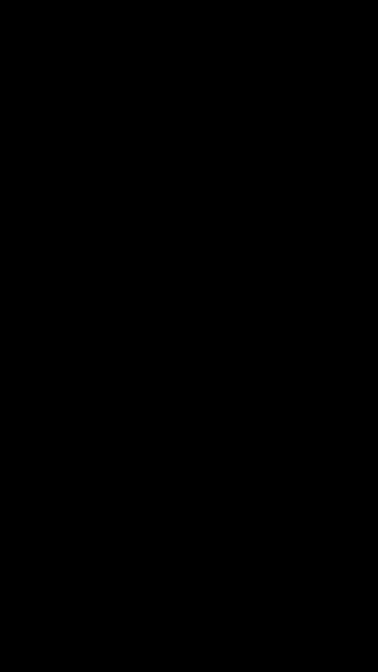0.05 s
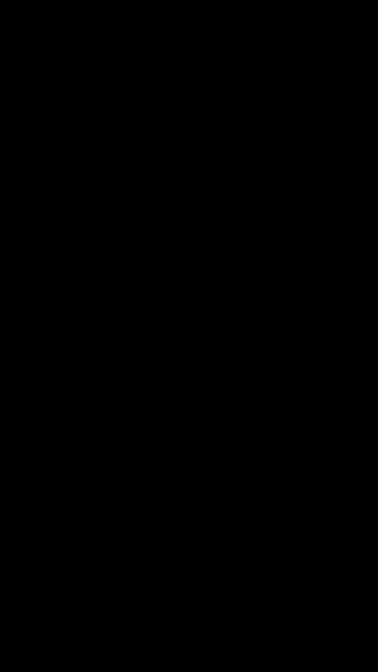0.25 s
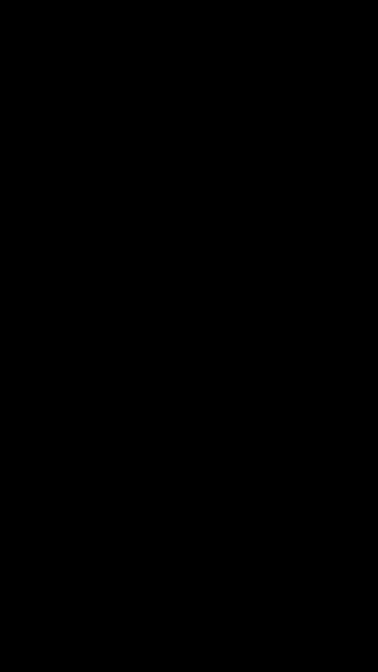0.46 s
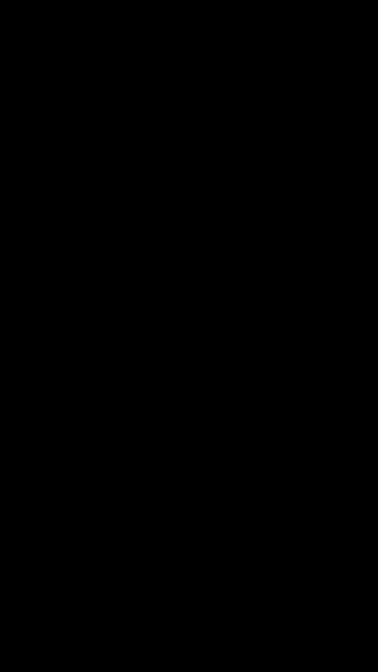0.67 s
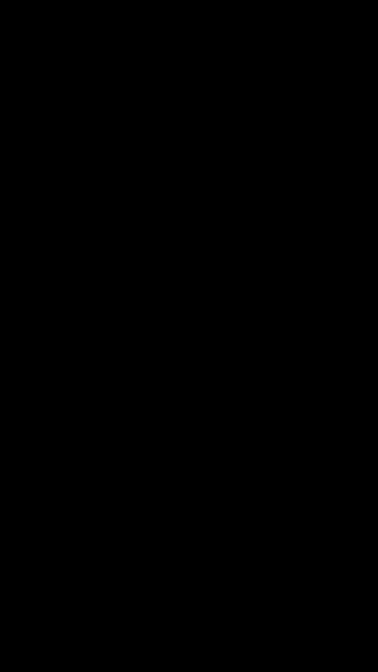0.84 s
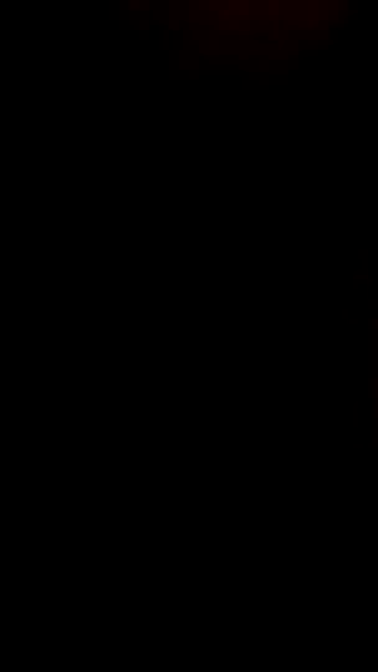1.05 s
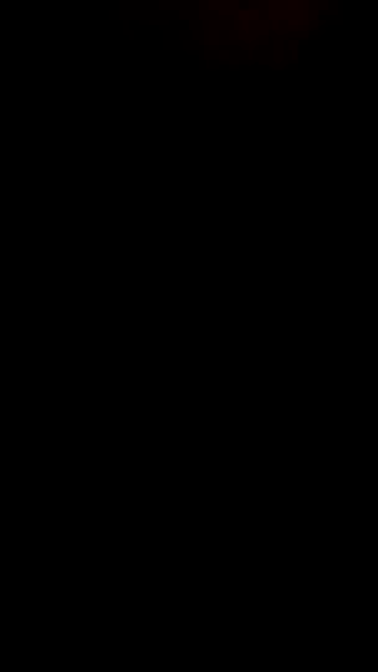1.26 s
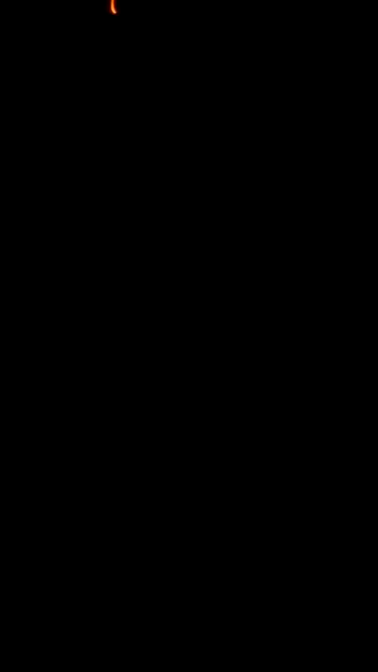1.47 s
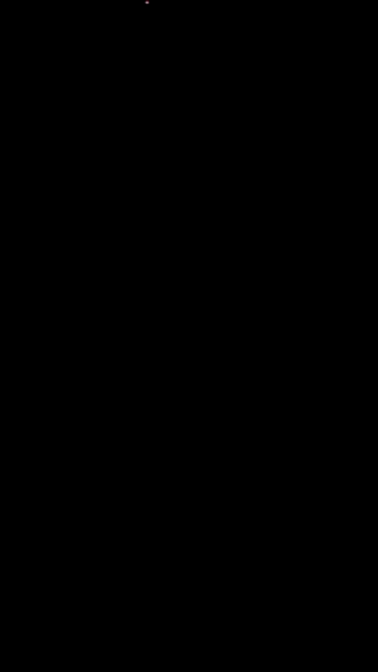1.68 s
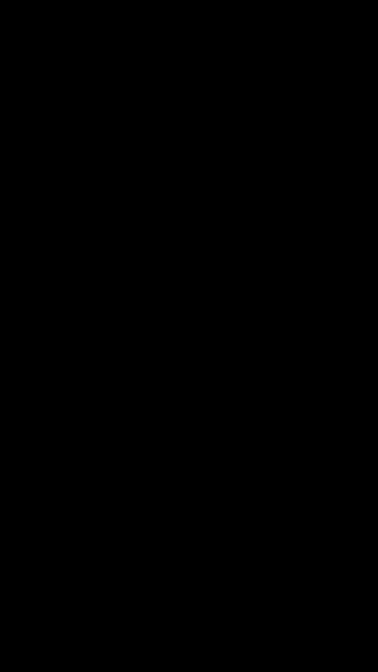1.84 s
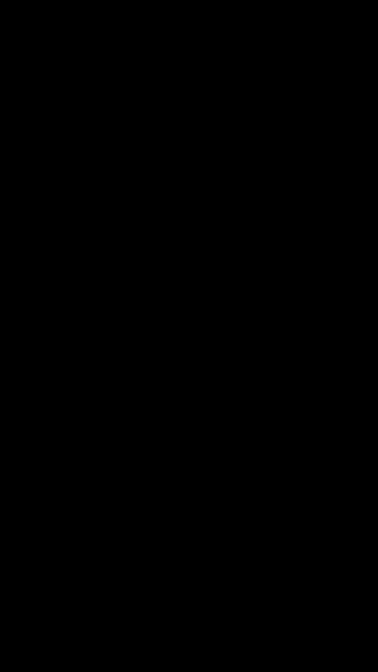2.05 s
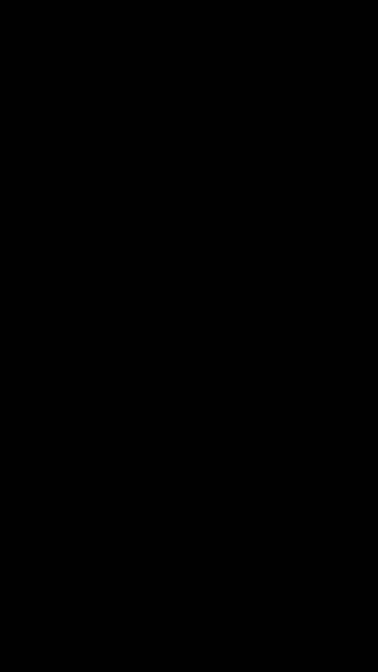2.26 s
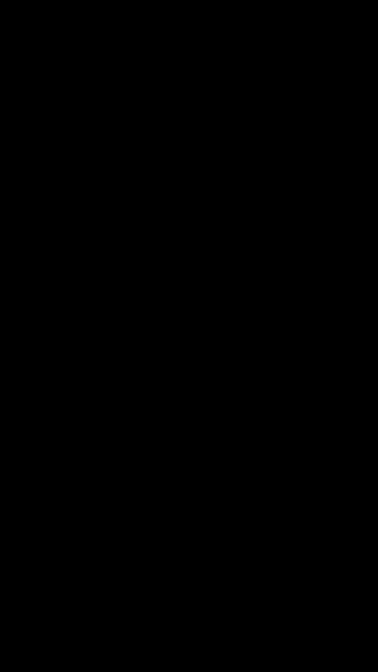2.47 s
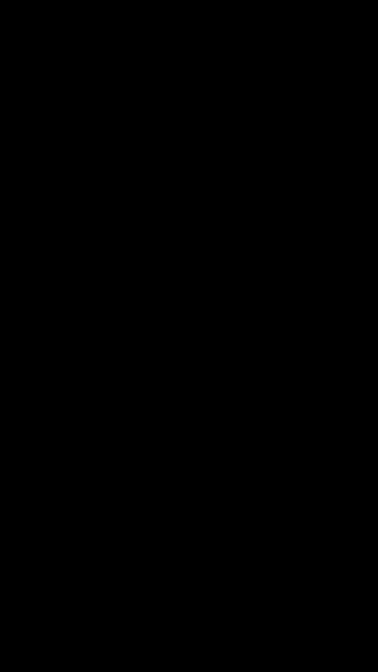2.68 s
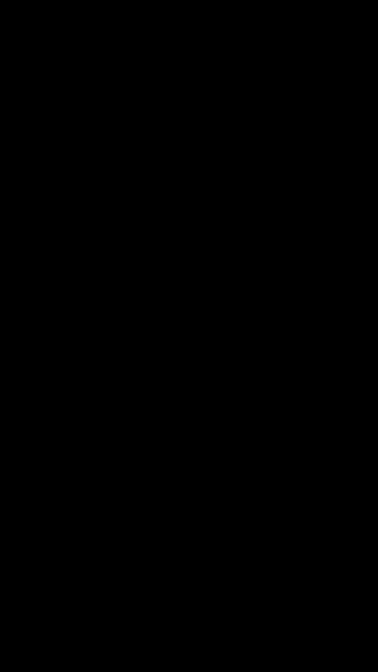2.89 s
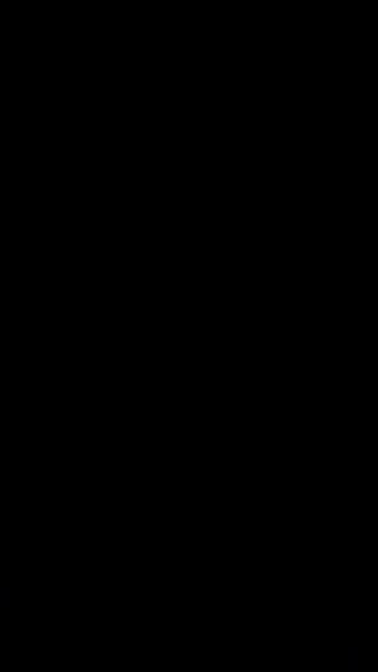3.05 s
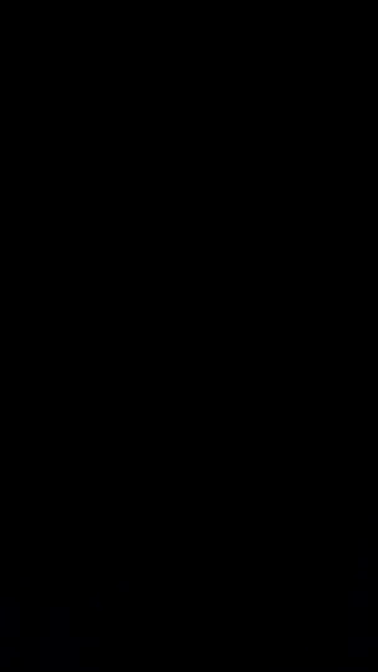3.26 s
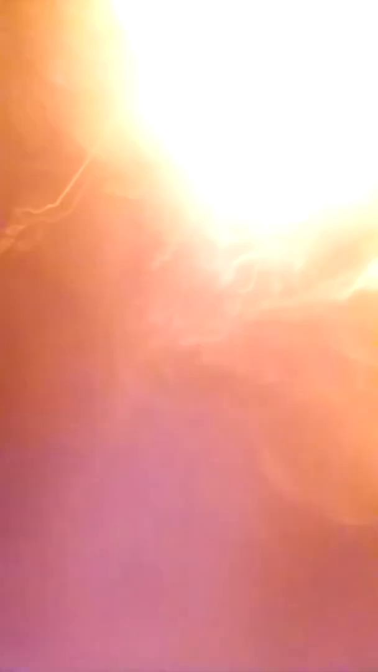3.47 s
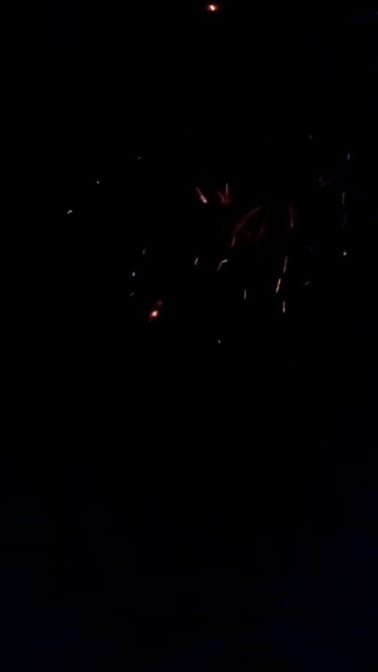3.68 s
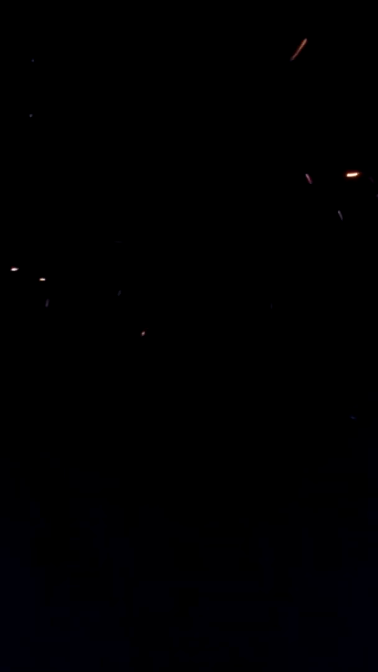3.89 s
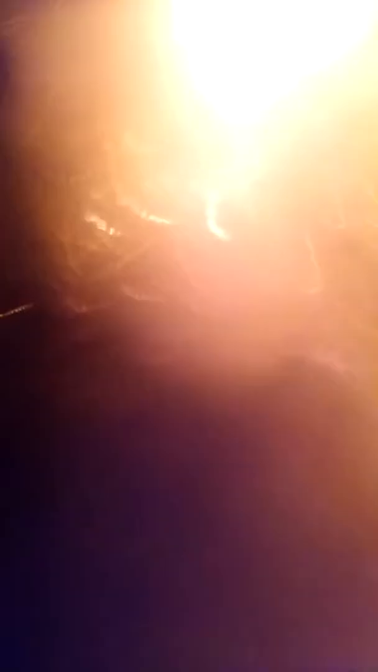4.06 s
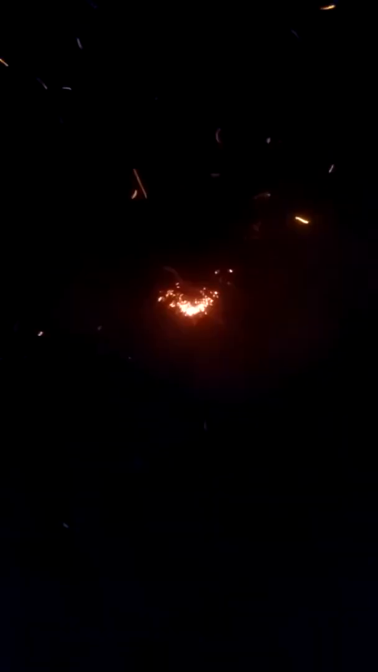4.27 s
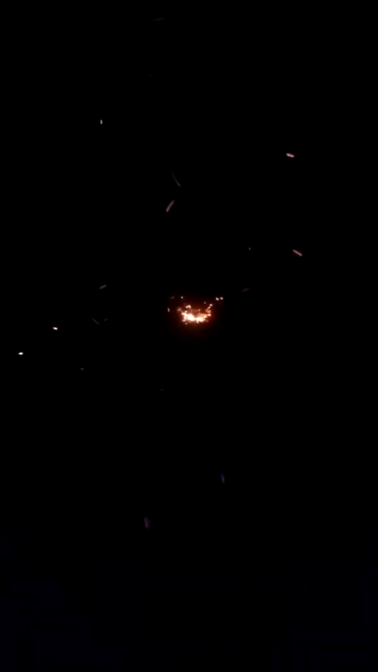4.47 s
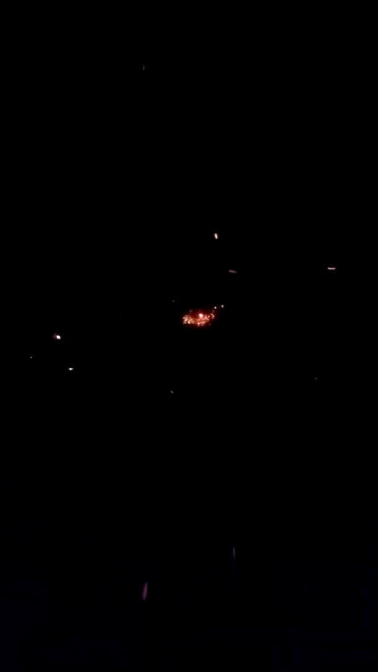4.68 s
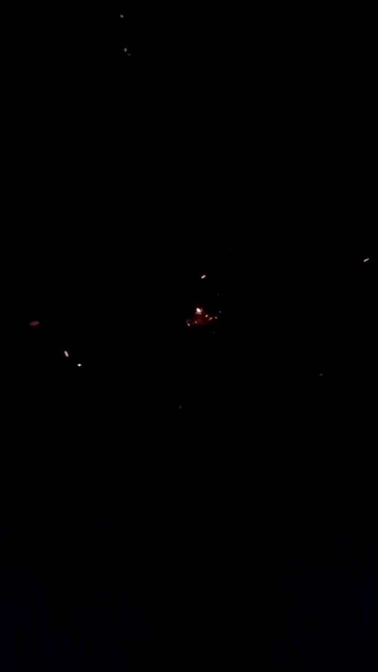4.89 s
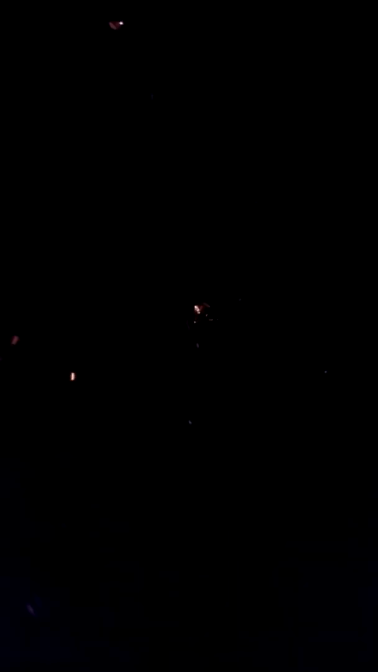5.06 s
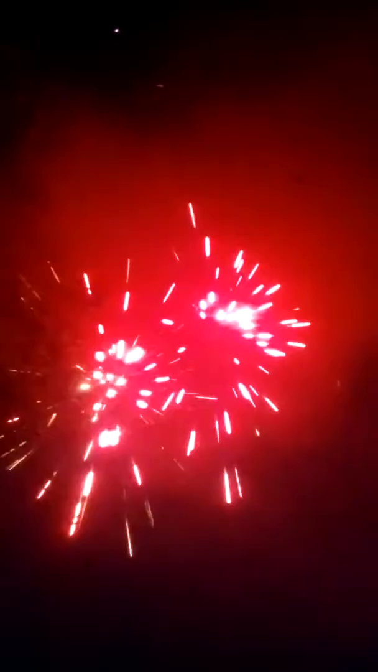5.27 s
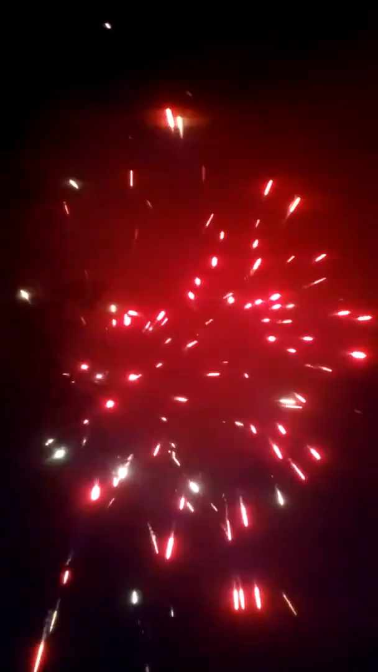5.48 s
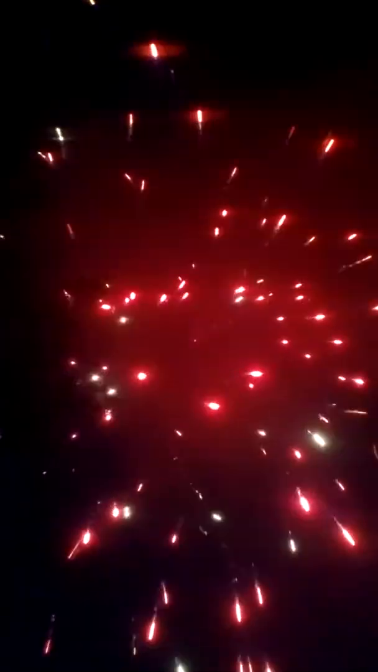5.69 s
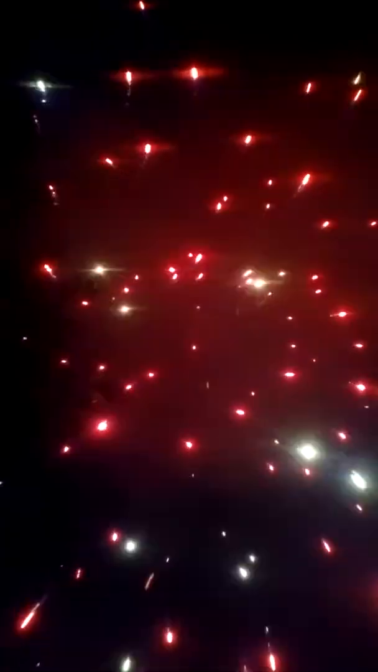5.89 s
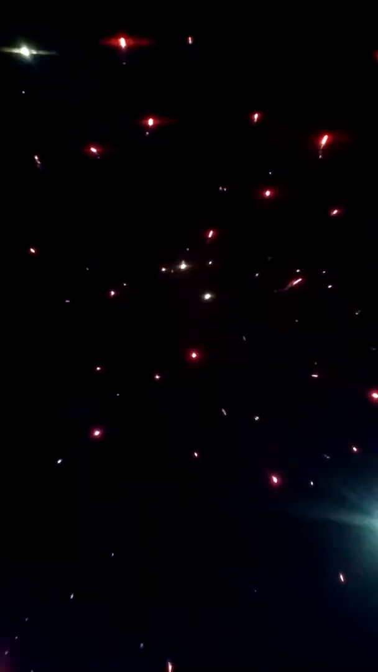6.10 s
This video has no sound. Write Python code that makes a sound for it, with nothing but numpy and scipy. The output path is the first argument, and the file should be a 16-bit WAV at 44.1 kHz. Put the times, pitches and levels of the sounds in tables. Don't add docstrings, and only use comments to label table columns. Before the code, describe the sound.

Outdoors at night, a burning fuse hisses thinly while a few far fireworks thud and pop. Then a very close bang cracks so hard that the phone microphone chokes, goes nearly silent and stutters back. A second choking bang follows half a second later, with its echo fading. After a pause comes the loudest blast, its noisy roll lingering to the end.

```python
import sys
import numpy as np
from scipy import signal
from scipy.fft import irfft, next_fast_len
from scipy.io import wavfile
from scipy.ndimage import uniform_filter1d, map_coordinates

SR = 44100
rng = np.random.default_rng(int(sys.argv[2]) if len(sys.argv) > 2 else 0)


def int16_out(signal):
    q = np.round(np.clip(np.atleast_2d(signal).T, -1, 1) * 32767)
    wavfile.write(sys.argv[1], SR, q.astype(np.int16))


def level_to_linear(level):
    exponent = np.asarray(level, float) / 20
    return 10 ** exponent


N = 270628

# frequency in Hz, level in dB per Hz.
FRESH_FUSE_COLOUR = [(35, -24), (100, -7.5), (450, -1), (900, -9), (1360, -1), (1900, -10), (3000, -7),
                     (5400, -3.5), (6800, -8), (7600, -17), (9300, -19), (16000, -33)]
DYING_FUSE_COLOUR = [(40, -25), (170, -19.5), (330, -12), (469, 1.5), (800, -22.5), (1110, -6.5),
                     (1510, -38.5), (1800, -15.5), (2700, -19.5), (4000, -22.5), (5700, -24.5),
                     (6800, -39.5), (7500, -47), (16000, -71)]
ECHO_COLOUR = [(24, -60.5), (40, -31), (171, -7.5), (412, -2.5), (455, -2), (542, -4.5), (615, -3),
               (1180, -11.5), (1760, -8), (2100, -12), (5310, -6.5), (8340, -27.5), (16000, -44.5)]
NIGHT_COLOUR = [(40, -21), (110, 4.5), (300, -15.5), (600, -35), (790, -4), (1100, -14), (1700, -9.5),
                (2150, -11), (2650, -16), (2970, -11), (3130, -13), (3290, -15.5), (3800, -14),
                (16000, -60)]
# lower edge in Hz, upper edge in Hz.
FIZZ_BANDS = [(50, 280), (280, 2400), (2400, 7000), (7000, 15500)]
ROLL_BANDS = [(50, 280), (280, 1200), (1200, 7000), (7000, 15500)]

# start in seconds,
# peak in dB, ring in Hz, cycles to fade, rise in cycles.
POPS = [(0.165, -13.5, 148, 0.86, 0.17), (1.685, -13, 183, 1.1, 0.15), (1.701, -25, 280, 2.3, 0.15),
        (1.715, -16, 310, 1.4, 0.12), (1.738, -10, 537, 2.6, 0.11), (1.771, -22, 503, 1.5, 0.15),
        (2.667, -12, 236, 1.1, 0.27), (2.695, -28, 455, 1.9, 0.15), (2.738, -27, 325, 1.3, 0.15),
        (3.314, -11.5, 323, 2, 0.15), (3.339, -5, 550, 1.5, 0.54), (3.416, -39, 455, 1.7, 0.17),
        (5.341, -38, 700, 1.2, 0.15), (5.941, -10, 446, 1.5, 0.14)]
FRONTS = [
    (3.5879, -11, 800, 2.1, 0.37),
    (3.5918, -1.5, 1059, 6.4, 0.082),
    (3.591, 0, 1894, 7.5, 0.088),
    (4.1364, 2.5, 452, 1.6, 0.055),
    (4.2704, -0.5, 378, 3.4, 0.17),
    (5.3747, -13, 456, 1.9, 0.056),
    (5.375, 3.5, 287, 3.7, 0.18),
    (5.394, 2, 508, 2.5, 0.2),
]
BOOMS = [(0.125, -30, 120, 1.2, .3), (0.31, -33, 70, 1.5, .3), (0.55, -33, 70, 2.2, .3),
         (2.745, -27, 110, 1.6, .3), (3.805, -11, 150, 3.5, .4), (3.86, -19, 100, 2.2, .4),
         (4.395, -17, 110, 2.2, .4), (4.69, -32, 150, 4.5, .5)]
SNAPS = [
    (1.7148, -17, 960, 0.54, 0.17),
    (3.3149, -15.5, 660, 1.2, 0.16),
    (5.3408, -34, 880, 1.7, .1),
    (5.224, -39, 1200, 1.1, .05),
]
# start in seconds, peak in dB, frequency in
# Hz, length in ms.
CRACKS = [(4.9686, -42, 7340, 0.068), (5.0918, -43, 6708, 0.07), (5.1163, -48, 7000, 0.07),
          (5.2225, -46, 6820, 0.077), (5.354, -40, 6848, 0.08),
          (5.8554, -47, 9050, 0.05), (5.9589, -45, 9490, 0.05), (6.0222, -29, 9350, 0.05),
              (6.0611, -28, 9290, 0.05), (6.1254, -35, 9434, 0.05),
          (1.1344, -32, 3070, 0.1), (1.2134, -22, 1500, 0.2), (1.5414, -32, 3900, 0.1),
         (1.6394, -38, 4150, 0.1), (5.2235, -37, 3400, 0.08)]
# centre in Hz, width in Hz, level in dB, start and
# end in seconds.
WHIRS = [(1900, 260, -44, -.4, 2.6), (5500, 400, -62, -.3, .4), (800, 120, -52, 4.3, 5.4),
         (520, 300, -22, 5.42, 6.5), (65, 50, -50, .6, 2.7), (70, 70, -42, 4.3, 5.15),
         (480, 200, -37, 3.8, 4.15), (1500, 700, -55, 4.4, 5.1), (320, 200, -24, 5.5, 6.5),
         (900, 160, -33, 4.37, 4.62), (490, 60, -45, .8, 3.9), (2180, 130, -57, 4.5, 5.7),
         (2420, 80, -61, 4.6, 5.8), (2970, 120, -59, 4.3, 5.6), (3290, 90, -62, 4.35, 5.6),
         (6900, 500, -80, 4.8, 5.5), (1700, 200, -66, 4.6, 5.5)]

# time in seconds, level in dB.
BURN = [(0.185, -65), (0.205, -39.5), (0.42, -40.5), (0.46, -32.5), (0.5, -40), (0.61, -34), (0.64, -47.5),
        (0.7, -38.5), (0.91, -38.5), (1.25, -47), (1.74, -45.5), (1.79, -47.5), (2.35, -46.5),
        (2.385, -45.5), (2.84, -49.5), (2.9, -43.5), (3.28, -44.5), (3.5, -51)]
# time in seconds, level in dB.
GLOW = [(0, -50), (1.05, -39), (1.55, -46), (1.85, -39), (2.1, -43), (2.55, -37), (2.72, -48), (3.12, -41),
        (3.5, -32)]
# start in seconds, bass in dB, middle in dB, fade in dB per second.
THUDS = [(0.03, -57, -40.5, 250), (0.171, -22, -46, 250), (0.455, -39, -50, 62), (1.68, -35, -40, 70),
         (2.668, -27, -53, 138), (3.31, -44, -25.5, 150), (3.375, -55, -34, 95)]
# time in seconds, extra delay in ms.
HAND = [(0, 0.91), (1.0, 0.83), (1.3, 0.74), (1.55, 0.71), (1.9, 0.55), (2.02, 0.71), (2.35, 0.62),
        (2.4, 0.93), (3.6, 0.97)]

# shock in seconds, full force until seconds, roll start in seconds, crest length in seconds,
# relative pace of fade.
BANGS = [
    (3.591, 3.714, 3.794, .07, 0.94),
    (4.136, 4.267, 4.387, .07, 1.2),
    (5.3735, 5.397, 5.4, 0.17, .66),
]
# high band in dB, then bass, middle and top against it in dB.
ROLLS = [
    (-17.5, -5, -12, -13.5),
    (-15, -11, -13, -17.5),
    (-8.5, -10.5, -2.5, -11),
]
ROLL_AIR_LOSS = [3.5, 3.5, 1.4]

# start in seconds, end in seconds, gain in dB.
STUCK = [(3.6068, 3.6965, -95), (3.6965, 3.777, -13), (4.1525, 4.258, -90), (4.2985, 4.3105, -26),
         (4.3105, 4.364, -48), (4.364, 4.378, -5), (5.3776, 5.3907, -50), (5.4015, 5.4042, -40),
         (5.410, 5.4107, -30), (6.138, 6.2, -90)]
# start in seconds, length in ms, gain in dB.
SLIPS = [(3.6965, 3, -4), (3.6995, 1.5, -30), (3.7145, 33, -4), (3.753, 4, -1), (3.761, 5, -3),
         (4.2125, 11, -38), (4.258, 6, -15), (4.264, 34.5, -3), (4.302, 1.5, -17), (4.309, 1.5, -7),
         (4.322, 1, -12), (4.329, 1.5, -16), (4.336, 1.5, -11), (4.340, 2, -12), (4.345, 6, -9),
         (4.3465, 2.5, -3), (4.357, 5, -9), (5.3794, 1.8, -1), (5.3825, 3.5, -1), (5.3872, 1.9, -4)]
# start in seconds, size in full scale, rise in ms.
JUMPS = [(3.605, 0.05, .3), (3.6754, 1.26, 0.083), (3.719, -0.87, 0.44), (3.7341, -0.89, 0.69),
         (3.752, -1, 1), (4.154, -0.15, .5), (4.2127, 0.06, 1), (4.2226, 0.18, .9), (4.223, 0.44, 0.054)]
# cutoff in Hz, Q.
RUMBLE_CUT = [(186.6, .75), (66.3, 1.07), (38.4, 2.1)]

HISS_DB = -81
STEP_S = .002
LONG = next_fast_len(int(3.6 * SR))

BURN_BASS_DB, BURN_MIDDLE_DB, BURN_TOP_DB = -6.5, 2, -17.5
MIDDLE_FADE_DB_PER_S, TOP_FADE_DB_PER_S = 1.2, 4
GLOW_BASS_DB, UNLIT_TOP_DB, THUD_RISE_DB_PER_S = -57, -68, 2500
FRESH_UNTIL_S, FRESH_FADE_S, UNLIT_SHARE = .95, 1.05, .4
GROUND_S, GROUND_SHARE, GROUND_HZ = 0.00085, 0.47, 2900
HAND_SHARE, HAND_TREMBLE_MS = .36, .012

SHOCK_DB, SHOCK_SHARE = np.array([-14.5, -7.5, -8, -18]), 0.74
FRONT_DULL_DB, FRONT_S = np.array([-2, 2.5, -7, -11]), .007
FADE_DB_PER_S = np.array([48, 55, 58, 100])
CREST_SHARE = np.array([0.74, .45, 0.92, .02])
NIGHT_DB, NIGHT_SHARE, NIGHT_PER_DB = np.array([-58, -63.5, -67, -83]), .3, .013

RAIL, CEILING, STUTTER = 0.95, 0.93, 0.25
CROSSOVER_HZ, CROSSOVER_WIDTH_HZ, TOP_HZ = 4010, 230, 15850


def spectrum(points, hz):
    f, db = np.transpose(points)
    return level_to_linear(np.interp(np.log(hz + 1), np.log(f), db))


def walk(rate_hz):
    hold = int(SR / rate_hz)
    steps = np.repeat(rng.standard_normal(N // hold + 1), hold)[:N]
    return 1.17 * uniform_filter1d(uniform_filter1d(steps, hold), hold)


def summed(*db):
    return 10 * np.log10(sum(level_to_linear(d) ** 2 for d in db))


def biquad(x, hz, q, high):
    w = 2 * np.pi * hz / SR
    a, c = np.sin(w) / (2 * q), np.cos(w)
    top = [(1 + c) / 2, -1 - c, (1 + c) / 2] if high else [a, 0, -a]
    return signal.lfilter(top, [1 + a, -2 * c, 1 - a], x)


def banded(rows, bands, first, second, flicker_db, rate_hz, air, echo=1):
    s, *band_db, share = rows
    hz = np.fft.rfftfreq(LONG, 1 / SR)
    start, at = int(s[0] * SR), (s * SR).astype(int)
    t = (start + np.arange(LONG)) / SR
    share = np.clip(np.interp(t, s, share), 0, 1)
    first_gain, second_gain = np.sqrt(share), np.sqrt(1 - share)
    centres = np.log2([np.sqrt(lo * hi) for lo, hi in bands])
    octaves = np.log2(hz + 1)
    colours = [spectrum(first, hz) * echo, spectrum(second, hz) * echo]
    noises = [c * np.exp(2j * np.pi * rng.random(len(hz))) for c in colours]

    def power_db(colour, lo, hi):
        inside = (hz > lo) & (hz < hi)
        return 10 * np.log10(2 * np.sum(np.abs(colour[inside]) ** 2) / LONG ** 2)

    own_db = [[power_db(c, lo, hi) for lo, hi in bands] for c in colours]
    loss_db = band_db[3] - band_db[2] - own_db[0][3] + own_db[0][2]
    out, gust = np.zeros(N + LONG), walk(rate_hz)
    for octave in np.arange(5, 14.6, .5):
        mask = np.cos(np.pi * np.clip(octaves - octave, -.5, .5)) ** 2
        weights = [np.interp(octave, centres, one) for one in np.eye(len(bands))]
        db = sum(weight * level for weight, level in zip(weights, band_db))
        db = db + air * max(octave - centres[3], 0) * loss_db
        db = db + flicker_db * (.7 * gust + .7 * walk(rate_hz))[at]
        a, b = (irfft(noise * mask, LONG) / level_to_linear(np.interp(octave, centres, own))
                for noise, own in zip(noises, own_db))
        out[start:start + LONG] += np.interp(t, s, level_to_linear(db)) * (first_gain * a + second_gain * b)
    return out[:N]


def before_bangs():
    return np.arange(N) < BANGS[0][0] * SR


def faint_hiss():
    return biquad(rng.standard_normal(N), 8000, .7, True) * level_to_linear(HISS_DB) * before_bangs()


def whirs():
    out, t = np.zeros(N), np.arange(N) / SR
    for hz, width_hz, db, start, end in WHIRS:
        q = hz / width_hz
        band = biquad(biquad(rng.standard_normal(N), hz, q, False), hz, q, False)
        swell = np.sin(np.pi * np.clip((t - start) / (end - start), 0, 1) ** .45)
        out += level_to_linear(db) * swell * band / np.std(band)
    return out


def ticks():
    out, t = np.zeros(N + 256), np.arange(256) / SR
    for s, db, hz, ms in CRACKS:
        age = t / ms * 1000
        start = int(s * SR)
        out[start:start + 256] += level_to_linear(db) * np.sin(2 * np.pi * hz * t) * np.e * age * np.exp(-age)
    return out[:N]


def fuse_levels():
    t = np.arange(0, BANGS[0][0], STEP_S)
    burn = np.interp(t, *np.transpose(BURN))
    glow = np.interp(t, *np.transpose(GLOW))
    fades = [np.where(t < s, THUD_RISE_DB_PER_S * (t - s), fade * (s - t)) for s, _, _, fade in THUDS]
    bass_thuds = [f + row[1] for f, row in zip(fades, THUDS)]
    middle_thuds = [f + row[2] for f, row in zip(fades, THUDS)]
    bass = summed(burn + BURN_BASS_DB, GLOW_BASS_DB, *bass_thuds)
    middle = summed(burn + BURN_MIDDLE_DB - MIDDLE_FADE_DB_PER_S * t, glow, *middle_thuds)
    top = summed(burn + BURN_TOP_DB, UNLIT_TOP_DB) - TOP_FADE_DB_PER_S * t
    ageing = np.exp(-(np.maximum(t - FRESH_UNTIL_S, 0) / FRESH_FADE_S) ** 2)
    fresh = np.where(t < BURN[1][0], UNLIT_SHARE, ageing)
    return t, bass, middle, burn, top, fresh


def fizz():
    hz = np.fft.rfftfreq(LONG, 1 / SR)
    mirror = GROUND_SHARE * np.exp(-(np.log((hz + 1) / GROUND_HZ) / 0.8) ** 4)
    ground = 1 - np.clip(mirror, 0, 1) * np.exp(-2j * np.pi * hz * GROUND_S)
    fuse = banded(fuse_levels(), FIZZ_BANDS, FRESH_FUSE_COLOUR, DYING_FUSE_COLOUR,
                  flicker_db=2.0, rate_hz=25, air=0.062, echo=ground)
    return fuse * before_bangs()


def hand(x):
    s, ms = np.transpose(HAND)
    n = np.arange(N)
    delay_ms = np.interp(n / SR, s, ms) + HAND_TREMBLE_MS * walk(5)
    late = map_coordinates(biquad(x, 3200, 0.55, False), [n - delay_ms * SR / 1000], order=3)
    return x - HAND_SHARE * late


def pulses():
    out, t = np.zeros(N + 4096), np.arange(4096) / SR
    for sign, table in [(-1, POPS), (-1, FRONTS), (-1, BOOMS), (1, SNAPS)]:
        for s, db, hz, cycles, rise in table:
            envelope = np.exp(-2 * t * hz / cycles) * (1 - np.exp(-t * hz / rise))
            wave = np.sin(2 * np.pi * hz * t) * envelope
            start = int(s * SR)
            out[start:start + 4096] += sign * level_to_linear(db) * wave / np.max(wave)
    return out[:N]


def roll():
    t = np.arange(BANGS[0][0] - STEP_S, N / SR, STEP_S / 2)
    db, share, air = np.full((4, len(t)), -150.), np.ones(len(t)), np.zeros(len(t))
    for bang, (high, bass, middle, top), loss in zip(BANGS, ROLLS, ROLL_AIR_LOSS):
        shock, held, start, crest, pace = bang
        roll_db = high + np.array([bass, middle, 0, top])
        front = FRONT_DULL_DB[:, None] * np.clip(1 - (t - shock) / FRONT_S, 0, 1)
        sag = np.clip((t - held) / (start - held), 0, 1)
        fall = pace * FADE_DB_PER_S[:, None] * np.maximum(t - start - crest * CREST_SHARE[:, None], 0)
        echo = SHOCK_DB[:, None] + front + sag * (roll_db - SHOCK_DB)[:, None] - fall
        echo_share = SHOCK_SHARE + sag * (1 - SHOCK_SHARE) - NIGHT_PER_DB * fall[2]
        after = t >= shock
        db[:, after] = summed(echo, NIGHT_DB[:, None])[:, after]
        share[after] = np.maximum(echo_share, NIGHT_SHARE)[after]
        air[after] = loss
    return banded((t, *db, share), ROLL_BANDS, ECHO_COLOUR, NIGHT_COLOUR, flicker_db=1.7, rate_hz=30, air=air)


def scene():
    return (faint_hiss() + whirs() + ticks() + hand(fizz()) + pulses() + roll())[None]


def capsule(x):
    t, free_db = np.arange(N) / SR, np.zeros(N)
    slips = [(s, s + ms / 1000, db) for s, ms, db in SLIPS]
    for start, end, db in [*STUCK, *slips]:
        free_db[int(start * SR):int(end * SR)] = db
    free_db = free_db + STUTTER * np.clip(free_db, -14, 0) * walk(1500)
    jumps = sum(size * np.clip((t - at) / (ms / 1000), 0, 1) for at, size, ms in JUMPS)
    return np.clip(x, -RAIL, RAIL) * uniform_filter1d(level_to_linear(free_db), size=5) + jumps


def band_limit(x):
    return signal.sosfilt(signal.butter(12, 16780, fs=SR, output="sos"), x)


def record(dry):
    x = capsule(dry[0])
    for hz, q in RUMBLE_CUT:
        x = biquad(x, hz, q, True)
    for _ in range(2):
        x = x - 2 * biquad(x, CROSSOVER_HZ, CROSSOVER_HZ / CROSSOVER_WIDTH_HZ, False)
    x = x / (1 + np.abs(x / CEILING) ** 4) ** .25
    x = signal.sosfilt(signal.ellip(8, .5, 60, TOP_HZ, fs=SR, output="sos"), x)
    mix = np.clip(x, -1, 1)[None]
    return band_limit(mix)


dry = scene()
out = record(dry)
int16_out(out)
```